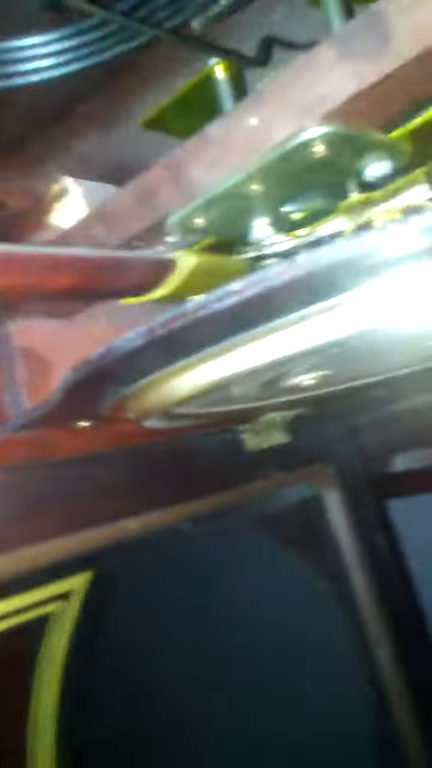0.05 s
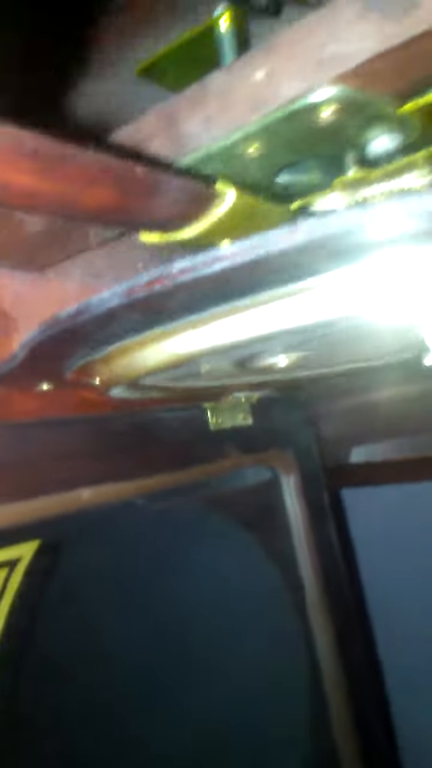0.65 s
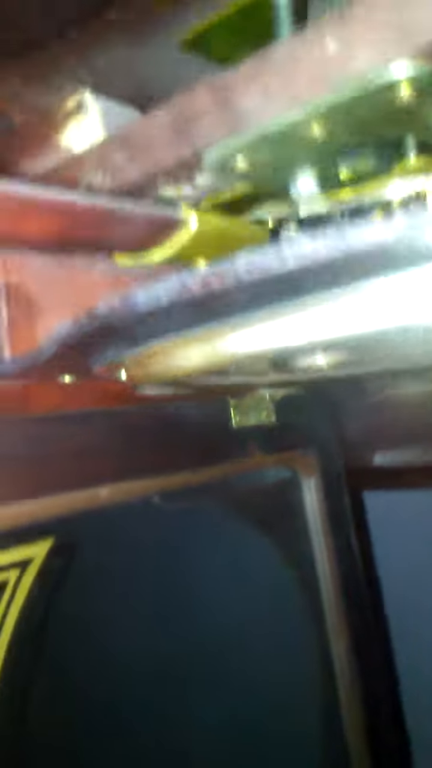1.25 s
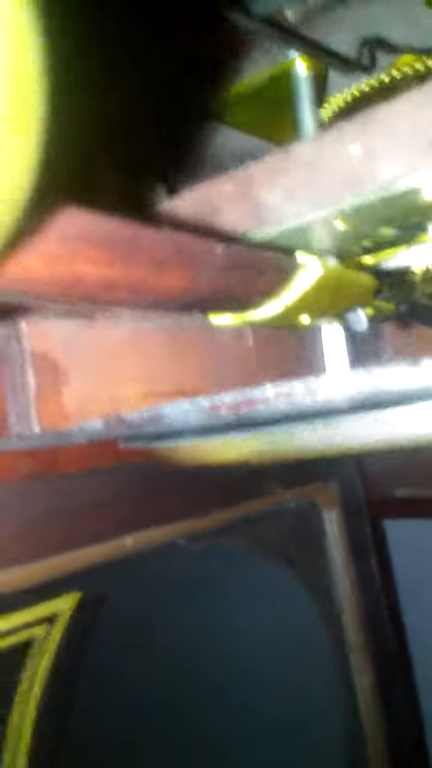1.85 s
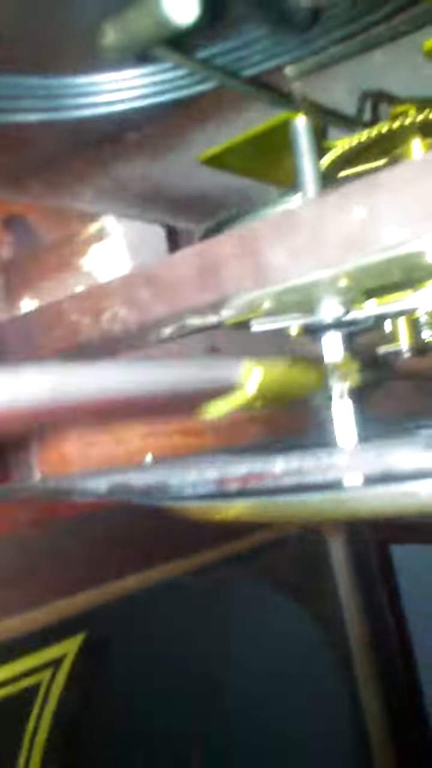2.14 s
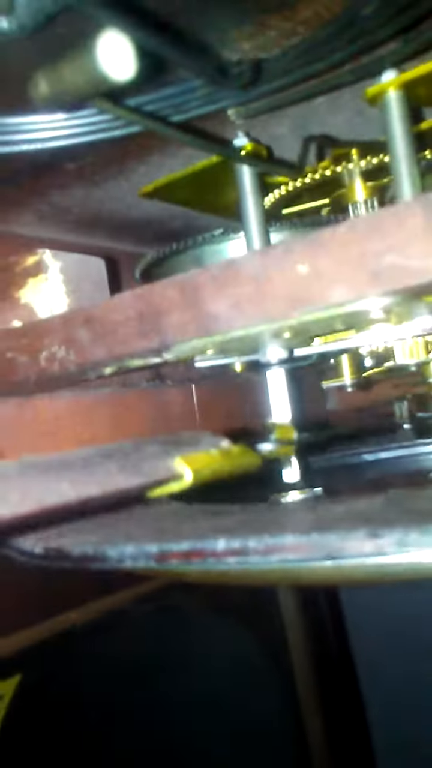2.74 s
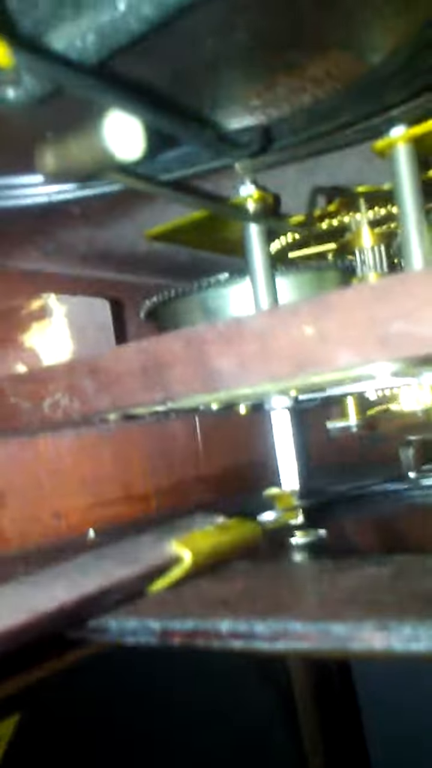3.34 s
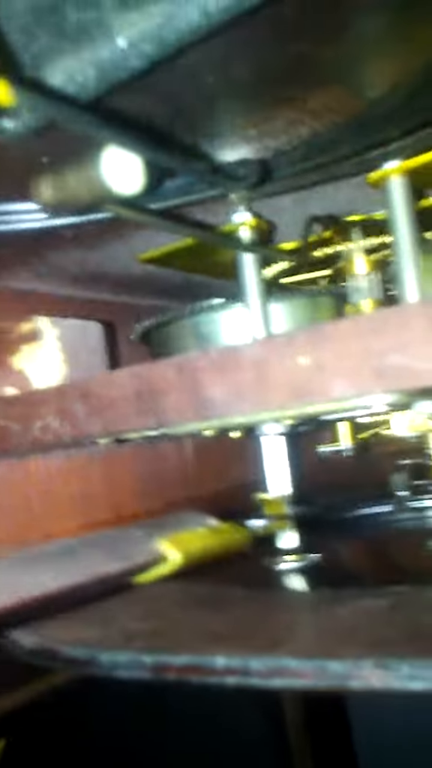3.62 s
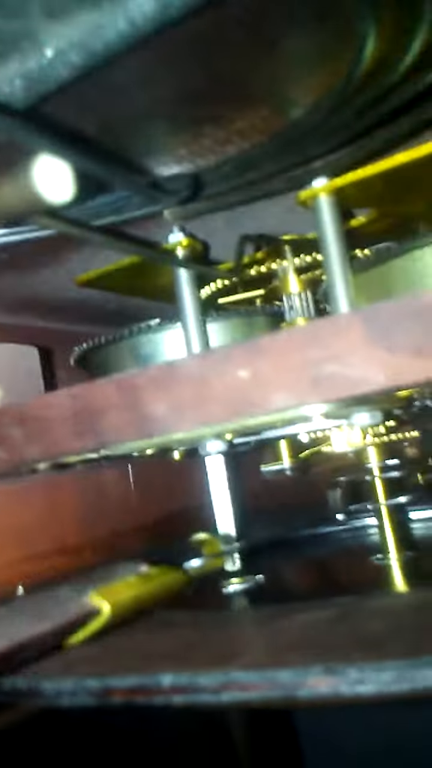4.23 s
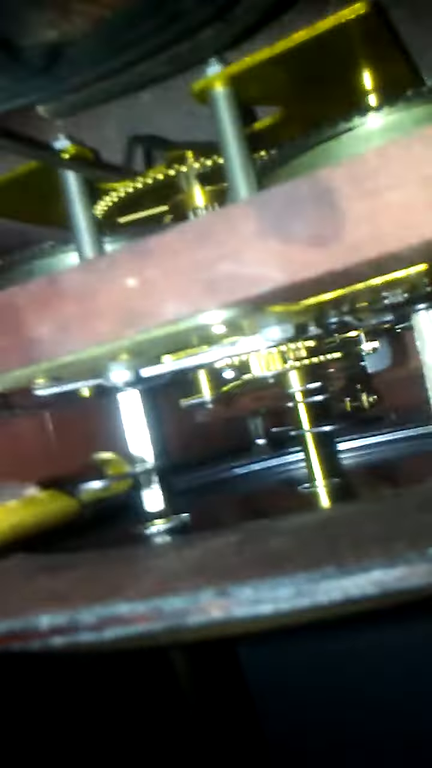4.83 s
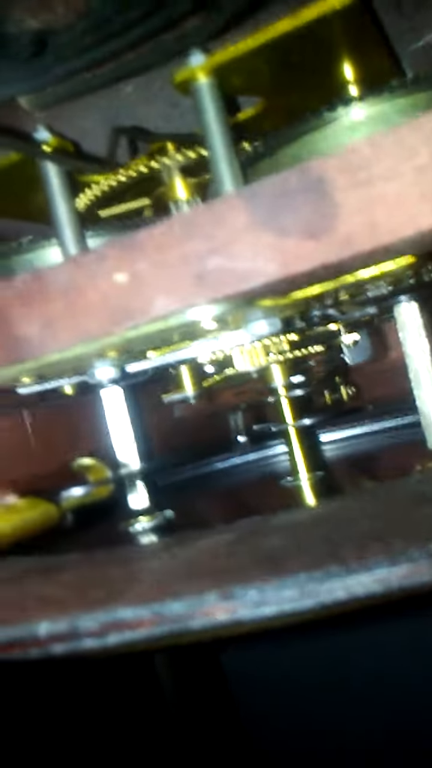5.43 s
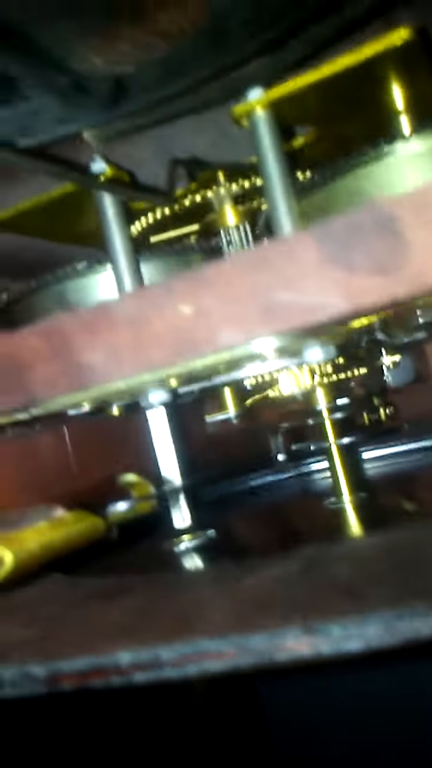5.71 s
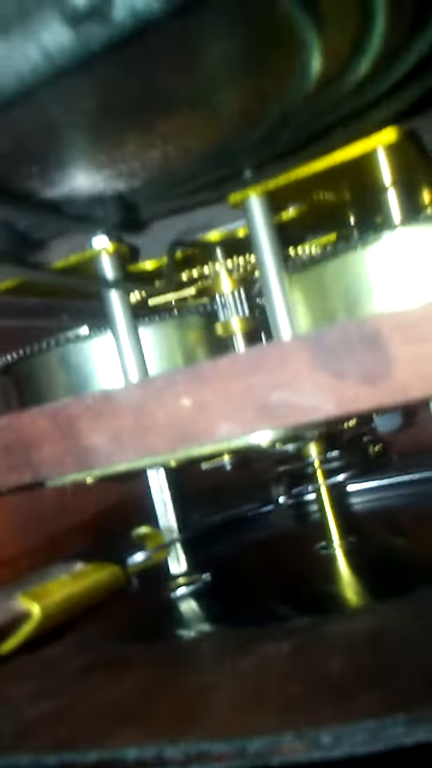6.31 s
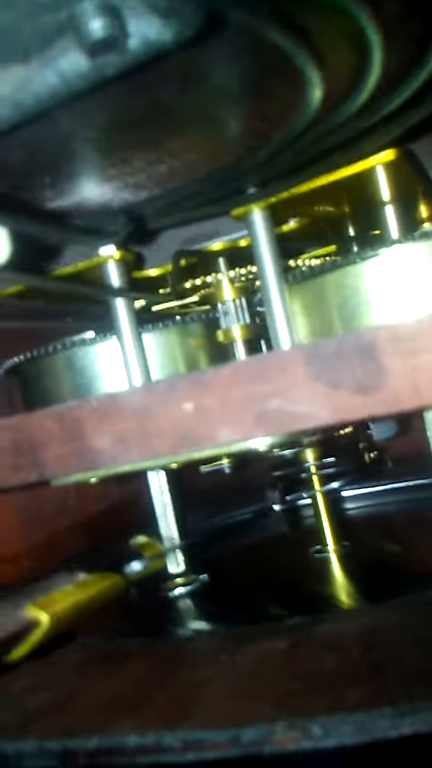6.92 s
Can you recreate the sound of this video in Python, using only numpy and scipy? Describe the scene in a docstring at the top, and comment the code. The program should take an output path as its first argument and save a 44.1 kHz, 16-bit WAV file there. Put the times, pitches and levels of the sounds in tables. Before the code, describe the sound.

Several mechanical clocks tick faintly throughout, overlapping at different rates in a quiet room with a low hiss. The microphone is close, inside a wooden clock case. A soft bump opens, and the handled mechanism gives sharper clicks about every half second until just after 2 seconds. At 1.6 seconds a loud, woody knock with a metallic edge sounds. From 1.75 seconds a metal part strikes again, ringing briefly, and bounces ever faster and softer, settling in a tiny chatter by 2 seconds. A hand bumps the case with a low thud at 2.4 seconds. Faint short creaks and a light slide come between 3.4 and 3.9 seconds. From 4.3 to 4.8 seconds there are three soft thuds, small clicks and a thin, glassy spring snap. The ticking continues, with one faint creak near 6.6 seconds.

```python
"""Inside a pendulum clock

One close microphone moves into the case, in a quiet room where other clocks tick at their own rates.
Each tick is an escapement tooth dropping on a pallet, coloured by case and room. A metal part of the
movement knocks, then knocks again and bounces to rest in a quickening rattle. Now and then a hand
bumps the case, and small parts creak, slide and snap."""
import sys
import numpy as np
from scipy import signal
from scipy.io import wavfile
from scipy.ndimage import uniform_filter1d

SR = 44100
rng = np.random.default_rng(int(sys.argv[2]) if len(sys.argv) > 2 else 0)


def master_out(mix):
    """Clip the mix to full scale and print it as 16-bit PCM to the path in sys.argv[1]."""
    frames = np.transpose(np.atleast_2d(mix))
    ceiling = np.clip(frames, -1, 1)
    pcm = np.round(ceiling * 32767).astype(np.int16)
    wavfile.write(sys.argv[1], SR, pcm)


N = 306936
HZ = np.fft.rfftfreq(8192, 1 / SR)  # frequency grid of all spectra
T = np.arange(SR // 3) / SR  # time axis of one short sound [s]

# colour of the case nearest the microphone: (frequency [Hz], level [dB])
NEAR_CASE_COLOUR = [(100, -25.5), (330, -11.5), (640, -17), (820, -7), (1230, -25.5), (1550, -4), (2000, 2),
                    (3100, -6.5), (3800, -2.5), (4400, -17), (5250, -16), (6200, -27), (7500, -41.5),
                    (15000, -36)]


def amp(db):
    """Decibels to gain."""
    return 10 ** (np.asarray(db) / 20)


def rms(x):
    """Root mean square."""
    return np.sqrt(np.mean(x ** 2) + 1e-20)


def fade(t60):
    """Decay by 60 dB in t60 seconds."""
    return np.exp(-np.log(1000) * T / t60)


def noise(length=len(T)):
    """White noise, by default as long as one short sound."""
    return rng.standard_normal(length)


def spectrum(points):
    """Joins (Hz, dB) points into a curve in dB on the grid HZ."""
    hz, db = np.transpose(points)
    return np.interp(np.log(HZ + 1), np.log(hz), db)


def shelf(corner_hz):
    """Rises smoothly from 0 below the corner to 1 above it."""
    return 1 - 1 / (1 + (HZ / corner_hz) ** 8)


def colour(x, db):
    """Minimum-phase filter with the given gain: resonances ring on after the blow."""
    log_gain = np.log(amp(np.r_[db, db[-2:0:-1]]))
    response = np.exp(np.conj(signal.hilbert(log_gain)))
    taps = np.fft.ifft(response).real
    return signal.oaconvolve(x, taps[:len(HZ)])[:len(x)]


def add(mix, s, sound):
    """Adds a sound to the mix at s seconds."""
    part = mix[max(round(s * SR), 0):][:len(sound)]
    part += sound[:len(part)]


def ring(modes, rise_s):
    """Struck modes (Hz, dB, t60) that swell and die away."""
    tones = sum(amp(db) * fade(t60) * np.sin(2 * np.pi * hz * T) for hz, db, t60 in modes)
    return tones * (1 - np.exp(-T / rise_s))


def body(points, resonances):
    """A broad colour with narrow resonances on top, in dB."""
    peaks = sum(db / (1 + (2 * (HZ - hz) / width) ** 2) for hz, width, db in resonances)
    return spectrum(points) + peaks


def ripple(depth_db, width_hz):
    """Chance peaks and dips in dB: the many modes of case and room."""
    lobe = np.exp(-((HZ[:129] - HZ[64]) / width_hz) ** 2)
    curve = np.convolve(uniform_filter1d(noise(len(HZ)), 3), lobe, "same")
    return depth_db * curve / rms(curve)


def repeats(first_s, period_s, levels):
    """Evenly spaced beats, each as loud as the level curve at its moment: rows (s, dB)."""
    times = np.arange(first_s, N / SR, period_s)
    return zip(times, np.interp(times, *np.transpose(levels)))


def beats(pattern, period_s, levels):
    """A clock repeats its pattern each period; its level drifts as the microphone moves into the case."""
    return [(s, db + beat_db, *tone)
            for first_s, beat_db, *tone in pattern
            for s, db in repeats(first_s, period_s, levels)]


def room_tone():
    """Steady room air and microphone hiss, with a faint high whine and mains hum."""
    # noise floor: (frequency [Hz], level [dB])
    floor = [(30, 6), (160, -1), (320, 0), (550, -9), (1200, -10.5), (2300, -6.5), (4000, -17), (9000, -21),
             (13000, -16.5), (15500, -14.5)]
    # whine within the hiss: (frequency [Hz], width [Hz], boost [dB])
    whine = [(8230, 110, 6)]
    air_db, hum_db, hum_hz = -70, -77, 119.6
    air = colour(noise(N), body(floor, whine))
    hum = np.sqrt(2) * np.sin(2 * np.pi * hum_hz * np.arange(N) / SR)
    return amp(air_db) * air / rms(air) + amp(hum_db) * hum


def tick(tone_db, sharpness, wash_s, tail_t60, rise_s, click_s, swell_s, tail_db):
    """A click, a wash of reflections in case and room, and a tail; sharpness is click gain over wash."""
    click = sharpness * np.exp(-T / click_s) * (1 - np.exp(-T / rise_s))
    wash = np.exp(-(T / wash_s) ** 2)
    room = np.hypot(wash, amp(tail_db) * fade(tail_t60)) * (1 - np.exp(-T / swell_s))
    sound = colour(np.hypot(click, room) * noise(), tone_db + ripple(depth_db=4.5, width_hz=40))
    return sound / rms(sound[:SR // 28])


def escapement(ticks, case_db, wash_s, tail_t60, recoil_db, lead_in_db, **shape):
    """A tooth drops on a pallet, then the wheel recoils softly; a faint lead-in precedes each tick."""
    lead_in_s = 0.0049
    bass, treble = 1 - shelf(2000), shelf(5200) * (1 - shelf(7000))
    out = np.zeros(N)
    for s, db, bass_db, treble_db, sharpness in ticks:
        tone_db = case_db + bass_db * bass + treble_db * treble
        drop = tick(tone_db, 2 * sharpness, wash_s, tail_t60, **shape)
        soft = tick(tone_db, 2.7, wash_s / 2, tail_t60 / 2, **shape) / np.hypot(1, sharpness)
        add(out, s, amp(db) * drop)
        add(out, s + rng.uniform(0.045, 0.05), amp(db + recoil_db) * soft)
        add(out, s - lead_in_s * rng.uniform(0.44, 1.5), amp(db + lead_in_db) * soft)
    return out


def far_clock():
    """A distant escapement beats once a second, with a strong recoil."""
    # its beat: (first time [s], level [dB], bass [dB], treble [dB], relative sharpness)
    pattern = [(0.818, 0, 0.018, 4.5, 6)]
    # level at the microphone: (time [s], level [dB])
    levels = [(0.8, -55), (2.8, -50), (4.8, -52), (6.8, -55)]
    # case colour: (frequency [Hz], level [dB])
    case = [(100, -46), (320, -2), (600, -20), (1230, -29), (1450, 4.5), (1680, 14), (1830, -3),
            (2300, 6.5), (3500, -4.5), (4000, 3.5), (4400, -15), (5300, -2), (6500, -38), (15000, -47)]
    # ringing parts: (frequency [Hz], width [Hz], boost [dB])
    rings = [(5700, 34, 7.8)]
    return escapement(beats(pattern, period_s=1, levels=levels), body(case, rings),
                      rise_s=0.0059, click_s=0.012, swell_s=0.0089, wash_s=0.043,
                      tail_db=-10, tail_t60=0.42, recoil_db=2.5, lead_in_db=-3)


def fast_clock():
    """A quick escapement elsewhere in the room, with a short tail."""
    # tick and tock: (first time [s], level [dB], bass [dB], treble [dB], relative sharpness)
    pattern = [(0.114, 0.0088, 3.7, -3, 2.3), (0.461, 0.029, 1.6, 4.5, 1.1)]
    # level at the microphone: (time [s], level [dB])
    levels = [(0.396, -53), (2.002, -53.5), (4.0, -56), (6.502, -58.5)]
    # case colour: (frequency [Hz], level [dB])
    case = [(100, -25.5), (320, -26), (620, -37), (820, -7.5), (1250, -19), (1900, 0), (2300, 2),
            (2650, -3), (3130, 1), (4050, -20.5), (4600, -29.5), (5300, -12.5), (7000, -38.5), (15000, -53)]
    # ringing parts: (frequency [Hz], width [Hz], boost [dB])
    rings = [(1960, 45, 8), (2230, 120, 5.1)]
    return escapement(beats(pattern, period_s=0.6424, levels=levels), body(case, rings),
                      rise_s=0.002, click_s=0.013, swell_s=0.006, wash_s=0.051,
                      tail_db=-3, tail_t60=0.14, recoil_db=-17, lead_in_db=-15)


def slow_clock():
    """An unhurried escapement in the room: a light tick and a louder, duller tock."""
    # tick and tock: (first time [s], level [dB], bass [dB], treble [dB], relative sharpness)
    pattern = [(0.166, -0.2, 0.25, 14, 0.37), (0.660, 3, -2.6, -5, 0.546)]
    # level at the microphone: (time [s], level [dB])
    levels = [(0.999, -51), (3.297, -50), (5.2, -51), (6.501, -50)]
    # case colour: (frequency [Hz], level [dB])
    case = [(100, -21), (350, -3.5), (720, -26.5), (1000, -2.5), (1230, -15.5), (1450, -8.5), (2300, 2),
            (3400, -14.5), (3800, -21), (4300, -25), (5300, -21.5), (6300, -37), (7500, -51.5),
            (15000, -41.5)]
    # ringing parts: (frequency [Hz], width [Hz], boost [dB])
    rings = [(1090, 70, 3)]
    return escapement(beats(pattern, period_s=1.0555, levels=levels), body(case, rings),
                      rise_s=0.0025, click_s=0.00488, swell_s=0.0083, wash_s=0.036,
                      tail_db=-7.5, tail_t60=0.26, recoil_db=-14.5, lead_in_db=-19)


def bright_clock():
    """A bright pendulum clock whose beats linger in the room."""
    # tick and tock: (first time [s], level [dB], bass [dB], treble [dB], relative sharpness)
    pattern = [(0.501, 0, -8.5, 5.5, 0.7), (1.040, -0.5, 7, -0.5, 1)]
    # level at the microphone: (time [s], level [dB])
    levels = [(0.5, -53.5), (3.399, -54.5), (5.3, -54), (6.8, -52)]
    # case colour: (frequency [Hz], level [dB])
    case = [(100, -26), (330, -12), (640, -24), (1300, -22), (1600, -18), (1850, 4), (2300, -2.5),
            (3100, -6), (3800, -3.5), (4500, -18), (5250, -7), (6200, -24.5), (7500, -41), (15000, -50)]
    # ringing parts: (frequency [Hz], width [Hz], boost [dB])
    rings = [(1020, 150, 11.5), (1960, 130, 9.5), (2760, 60, 4), (3930, 60, 5.5), (5530, 180, 12)]
    return escapement(beats(pattern, period_s=1.0542, levels=levels), body(case, rings),
                      rise_s=0.001, click_s=0.006, swell_s=0.021, wash_s=0.051,
                      tail_db=-11, tail_t60=0.54, recoil_db=-12, lead_in_db=-12)


def stepping_clock():
    """Each second a wheel is released, caught and stopped: quick clicks that build to a crisp snap."""
    # clicks of one step: (time from the stop [s], level [dB], sharpness)
    clicks = [(-.0335, -14, 1.2), (-.0212, -6.5, 2.5), (-.0175, -6, 3.5), (0, -8, 5), (.0026, -3, 8)]
    # level at the microphone: (time [s], level [dB])
    levels = [(0.1, -39.5), (2.0, -40), (3.0, -42.5), (5.0, -42.5), (6.1, -47)]
    # case colour: (frequency [Hz], level [dB])
    case = [(100, -15), (550, -23.5), (900, -6), (1150, -21), (1450, -2), (2600, 11.5), (2980, 2.5),
            (3300, 9), (4250, -4), (4900, 4.5), (5600, -3), (6400, -14), (7600, -39), (15000, -32)]
    # ringing parts: (frequency [Hz], width [Hz], boost [dB])
    rings = [(930, 76, 6), (1470, 220, 9), (1843, 110, 8), (2640, 150, 5), (4940, 320, 4.5),
             (5220, 90, 4.5)]
    out, case_db = np.zeros(N), body(case, rings)
    for s, db in repeats(first_s=0.0603, period_s=1, levels=levels):
        for delay, click_db, sharpness in clicks:
            click = tick(case_db, sharpness, rise_s=0.001, click_s=0.0038,
                         swell_s=0.029, wash_s=0.026, tail_db=-13.5, tail_t60=0.22)
            add(out, s + delay, amp(db + click_db) * click)
    return out


def swishes():
    """Parts slide in light contact: hiss that swells and fades."""
    # slides: (time of the peak [s], level [dB])
    slides = [(2.631, -70), (3.766, -62.5), (5.775, -67)]
    # their colour: (frequency [Hz], level [dB])
    slide_colour = [(1000, -27), (3300, -4.5), (6500, -6), (7600, -24), (10000, -45)]
    t = np.arange(N) / SR
    hiss = colour(noise(N), spectrum(slide_colour))
    swells = sum(amp(db) * np.exp(-((t - s) / 0.037) ** 2) for s, db in slides)
    return hiss / rms(hiss) * swells


def creaks():
    """A rubbed part sings at one resonance, its pitch and strength shaking."""
    # singing parts: (time [s], relative level [dB], frequency [Hz], t60 [s])
    parts = [(3.405, -51, 436, 0.17), (3.459, -44.5, 572, 0.077), (3.501, -66, 3990, .18),
             (3.755, -50.5, 2030, 0.13), (3.816, -47.5, 548, 0.066), (3.839, -49.5, 424.5, 0.17),
             (6.626, -57.5, 434, 0.17), (6.633, -62, 1317, 0.13)]
    out, shake_s = np.zeros(N), 0.0032
    for s, db, hz, t60 in parts:
        shake = signal.lfilter([1], [1, -np.exp(-1 / (shake_s * SR))], rng.standard_normal((2, len(T))))
        grip = 1 + 0.4 * (shake[0] + 1j * shake[1]) / rms(shake)
        tone = (grip * np.exp(2j * np.pi * hz * T)).imag
        onset = (1 - np.exp(-T / (0.028 * t60))) ** 2
        add(out, s, 2 * amp(db) * tone * fade(t60) * onset)
    return out


def case_clicks():
    """The case gives under the hand with tiny dry clicks."""
    # clicks: (time [s], level [dB])
    clicks = [(0.1056, -44.5), (4.2935, -65), (4.303, -56.5), (4.78, -57.5)]
    # their colour: (frequency [Hz], level [dB])
    click_colour = [(400, -30), (1200, -24), (2500, -13), (4200, -7), (5400, 1), (6600, -5.5), (7800, -25),
                    (15000, -20)]
    out = np.zeros(N)
    for s, db in clicks:
        click = colour(noise() * fade(0.025), spectrum(click_colour))
        add(out, s, amp(db) * click / rms(click[:SR // 250]))
    return out


def hand_bumps():
    """The hand meets the case: a low swaying thud, a short rub and a faint hum of the coiled gong."""
    # bumps: (time [s], relative level [dB], frequency [Hz], t60 [s], rub offset [dB])
    bumps = [(0.091, -35.5, 57.6, 0.12, -15.5), (1.496, -41.5, 68.1, 0.12, -12.5),
             (2.414, -25, 72, 0.059, -18), (2.411, -22.5, 117.6, 0.038, -27), (4.282, -29.5, 52, 0.1, -11),
             (4.554, -30.5, 66, 0.073, -15), (4.771, -36, 64.4, 0.12, -11.5)]
    # skin rubbing on wood: (frequency [Hz], level [dB])
    rub_colour = [(40, -6), (150, 2), (300, -20), (460, -10), (650, -27.5), (2000, -28), (6000, -39.5),
                  (9000, -66)]
    # gong modes: (frequency [Hz], level relative to the rub [dB], t60 [s])
    gong_modes = [(314, -18, 0.9), (320, -21, 1.0)]
    out, gong = np.zeros(N), ring(gong_modes, rise_s=0.055)
    for s, db, hz, t60, rub_db in bumps:
        sway = 2.6 * ring([(hz, 0, t60)], rise_s=0.0086)
        rub = colour(noise(), spectrum(rub_colour))
        rub = rub / rms(rub) * fade(0.15) * (1 - np.exp(-T / 0.0044))
        add(out, s, amp(db) * (sway + amp(rub_db) * (rub + gong)))
    return out


def near_clock():
    """The handled movement clicks unevenly, right at the microphone."""
    # clicks: (time [s], level [dB], bass [dB], treble [dB], relative sharpness)
    ticks = [(0.1578, -40, -4, 8, 2.5), (0.359, -56, 6, -18, 0.3), (0.6505, -46, -11, -4, 3),
             (1.157, -40, -8, -2, 15), (1.6758, -43.5, -8, -1, 7.3), (2.1488, -39.5, -2.5, 7, 4.9),
             (2.312, -56, -8, 8, 8.9), (2.364, -60.5, 3, -14.5, 0.93), (4.302, -54, 2, 5.5, 5.3),
             (4.578, -41, 11.5, 7, 1.5), (4.593, -47.5, 7, -6, 1.9), (4.698, -50.5, 7, 5, 0.8)]
    # ringing parts: (frequency [Hz], width [Hz], boost [dB])
    rings = [(1391, 77, 16.5), (4850, 25, 3)]
    return escapement(ticks, body(NEAR_CASE_COLOUR, rings),
                      rise_s=0.0009, click_s=0.006, swell_s=0.0082, wash_s=0.033,
                      tail_db=-5, tail_t60=0.14, recoil_db=-14, lead_in_db=-12.5)


def spring():
    """A thin spring snaps back with a glassy tick and a faint hiss."""
    # the snap: (time [s], level [dB], t60 [s], tail level [dB], tail t60 [s])
    snap = (4.577, -46, 0.025, -15, .2)
    # its colour: (frequency [Hz], level [dB])
    snap_colour = [(9000, -21), (11200, -2), (12000, 4), (15500, -6)]
    s, db, t60, tail_db, tail_t60 = snap
    out, hiss = np.zeros(N), colour(noise(), spectrum(snap_colour))
    envelope = np.hypot(fade(t60), amp(tail_db) * fade(tail_t60))
    add(out, s, amp(db) * hiss / rms(hiss) * envelope)
    return out


def chatter():
    """The settling part taps its stop faster and faster until it lies still."""
    # course of the chatter: (time [s], level [dB])
    levels = [(1.963, -62.5), (2.01, -60), (2.033, -49.5), (2.045, -60.5)]
    # its colour: (frequency [Hz], level [dB])
    tap_colour = [(330, 12), (600, -4), (1100, -12), (1900, 4), (2600, 1), (4200, -12), (5200, -1),
                  (6700, -3), (7300, -14), (7900, -32), (15000, -45)]
    times, db = np.transpose(levels)
    t = np.arange(times[0], times[-1], 1 / SR)
    rate = np.geomspace(70, 200, len(t))  # nominal contacts per second
    unsteady = np.exp(2 * uniform_filter1d(noise(len(t)), SR // 500))
    since_contact = np.cumsum(rate * unsteady) / SR % 1 / rate
    contacts = np.exp(-since_contact / 0.0013) * noise(len(t))
    contacts *= amp(np.interp(t, times, db) - db.max())
    sound = colour(np.r_[contacts, np.zeros(len(T))], spectrum(tap_colour))
    out = np.zeros(N)
    add(out, times[0], amp(db.max()) * sound / rms(sound[:len(t)]))
    return out


def rattle(t60, count, gap_s=0.0024, step_db=-4):
    """Envelope of a loose contact: it touches several times in a few milliseconds, ever more lightly."""
    out = np.zeros(len(T))
    for k, slip in enumerate(rng.uniform(0.8, 1.2, count)):
        add(out, k * slip * gap_s, amp(k * step_db) * fade(t60))
    return out


def bounces():
    """The part drops and bounces to rest; softer contacts are duller."""
    # contacts: (time [s], force [dB])
    contacts = [(1.7451, -1), (1.8200, -4), (1.8822, -5), (1.9335, -7), (1.9625, -10.5), (1.9775, -10.5),
                (1.9900, -13.5), (1.9985, -15.5)]
    # rows for ring, thud, crack and treble: (level at full force [dB], slope [dB per dB of force])
    force_law = [(-8.5, 2), (-5, 1.7), (-20, 2.5), (6, 6)]
    return [(s, *(db + slope * force_db for db, slope in force_law)) for s, force_db in contacts]


def knocks():
    """Each contact cracks, thuds into the wooden case and sets the metal ringing, with a faint echo."""
    # single knocks: (time [s], ring [dB], thud [dB], crack [dB], treble of the crack [dB])
    single_knocks = [(1.5721, -18.5, -1.5, -20, 11), (1.5744, -38, -12, -25, 26.5),
                     (2.4123, -52.5, -28, -31.5, -18), (2.5782, -68.5, -40, -52, -4),
                     (4.5775, -40.5, -59, -55, -11)]
    # modes of the metal part: (frequency [Hz], level bounced [dB], level knocked [dB], t60 [s])
    metal_modes = [(540, -30, -14, .07), (832, 0, 0, .13), (1419, -26, -19, .12), (1531, -15, -6, .08),
                   (1675, -35, -5, .1), (2382, -24, -22, .17), (2476, -17, -9, .08), (3510, -31, -28, .08),
                   (3903, -31, -28, .12), (5128, -26, -28, .11), (5215, -34, -29, .1)]
    # modes of the wooden case: (frequency [Hz], level [dB], t60 [s])
    wood_modes = [(110, -15, 0.012), (242, -4.5, 0.018), (335, -1, 0.02), (351, -20, 0.047),
                  (570, -13, 0.012)]
    # colour of the crack: (frequency [Hz], level [dB])
    crack_colour = [(100, -7), (540, 8), (750, 6), (1150, -8), (1650, 3.5), (2050, 0), (2550, 1),
                    (3400, -7), (3900, -5), (4400, -11), (5100, 3), (6200, -8), (7400, -6), (8300, -17),
                    (10300, -8), (13500, -18), (15500, -38)]
    # recorder hiss that comes up briefly after a loud, bright sound: (frequency [Hz], level [dB])
    hiss_colour = [(4000, -30.5), (8000, -2.5), (12000, 0)]
    out, wood = np.zeros(N), ring(wood_modes, rise_s=0.0011)
    bounced = [(hz, db, t60) for hz, db, _, t60 in metal_modes]
    knocked = [(hz, db, t60) for hz, _, db, t60 in metal_modes]
    main_mode_hz, attack = metal_modes[1][0], slice(SR // 100)
    crack_tone = spectrum(crack_colour)
    echo_tone = spectrum(NEAR_CASE_COLOUR) + 5 * (1 - shelf(700))
    for contacts, modes in (single_knocks, knocked), (bounces(), bounced):
        for s, ring_db, thud_db, crack_db, treble_db in contacts:
            # the contact point wanders, so the upper modes are struck differently each time
            struck = [(hz, db + chance_db * (hz > main_mode_hz), t60)
                      for (hz, db, t60), chance_db in zip(modes, 2 * noise(len(modes)))]
            metal = ring(struck, rise_s=0.0027)
            # the highest part of the crack, its snap, dies first
            crack = colour(noise() * rattle(t60=0.014, count=3), crack_tone - 28 * shelf(6400))
            snap = colour(noise() * fade(0.0038), crack_tone + treble_db - 50 * (1 - shelf(4600)))
            echo = colour(noise() * fade(0.15), echo_tone + ripple(depth_db=3, width_hz=60))
            impact = (crack + snap) / rms(crack[attack]) + amp(-20) * echo / rms(echo[attack])
            hiss = colour(noise() * fade(0.28), spectrum(hiss_colour))
            hiss_gain = amp(-53) * np.tanh(amp(crack_db + treble_db + 20.5))
            add(out, s, amp(crack_db) * impact + hiss_gain * hiss)
            add(out, s + 0.0016, amp(ring_db) * metal + amp(thud_db) * wood)
    return out


def scene():
    """The clocks, the metal parts and the handling, heard from a microphone that moves into the case."""
    clocks = near_clock() + bright_clock() + slow_clock() + fast_clock() + far_clock() + stepping_clock()
    metal_parts = knocks() + chatter() + spring()
    handling = hand_bumps() + case_clicks() + creaks() + swishes()
    return (clocks + metal_parts + handling + room_tone())[None]


def record(dry):
    """The microphone loses the deepest bass, rounds off the highest peak and cuts the extreme treble."""
    low_cut_hz, ceiling, high_cut_hz = 47, 0.85, 15900
    thin = signal.sosfilt(signal.butter(4, low_cut_hz, "highpass", fs=SR, output="sos"), dry)
    rounded = thin / (1 + (thin / ceiling) ** 6) ** (1 / 6)
    lowpass = signal.firwin(511, high_cut_hz, window=("kaiser", 9), fs=SR)
    return signal.oaconvolve(rounded, lowpass[None], "same")


dry = scene()
out = record(dry)
master_out(out)
```